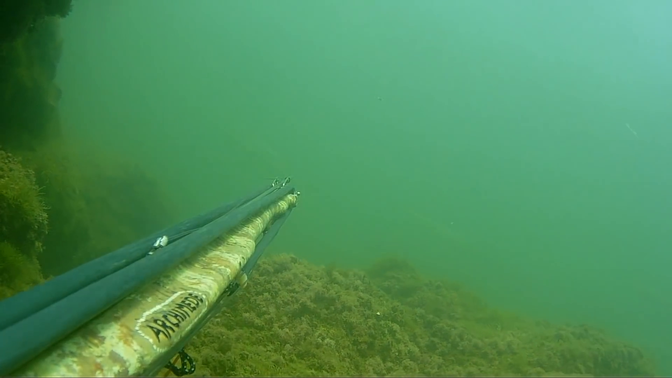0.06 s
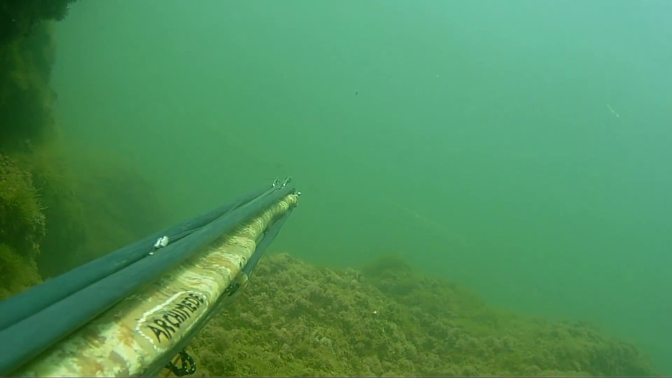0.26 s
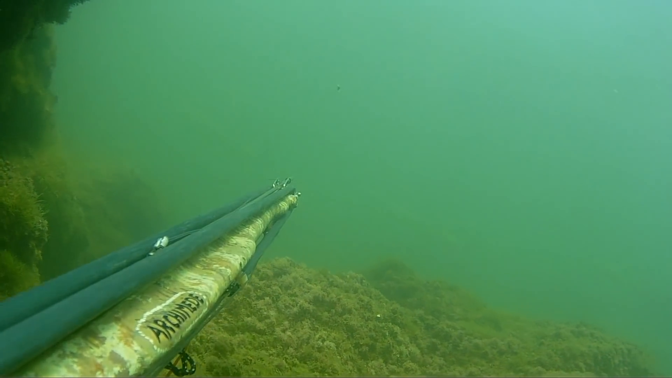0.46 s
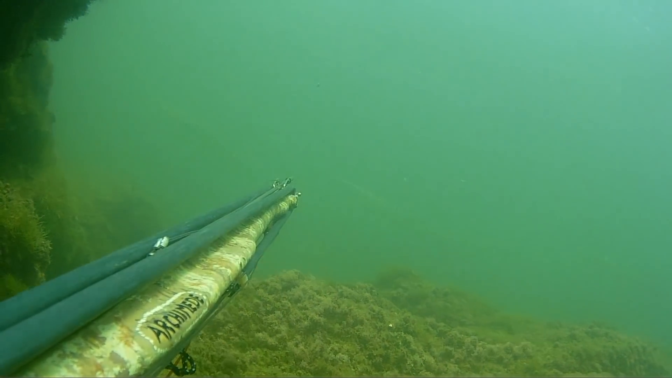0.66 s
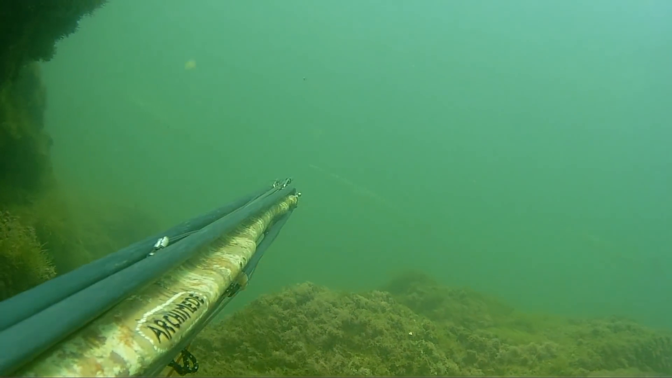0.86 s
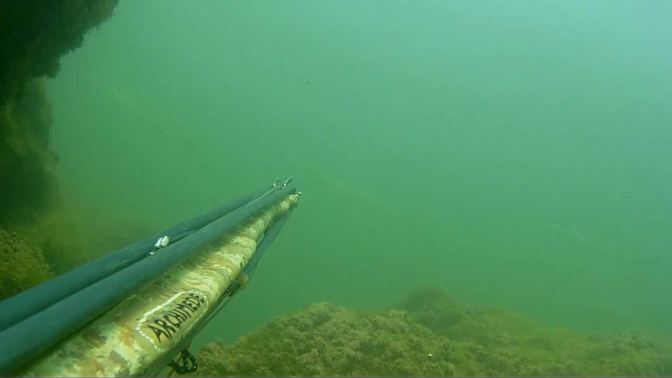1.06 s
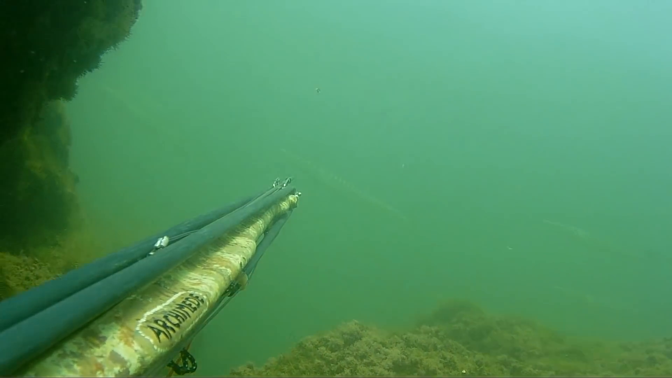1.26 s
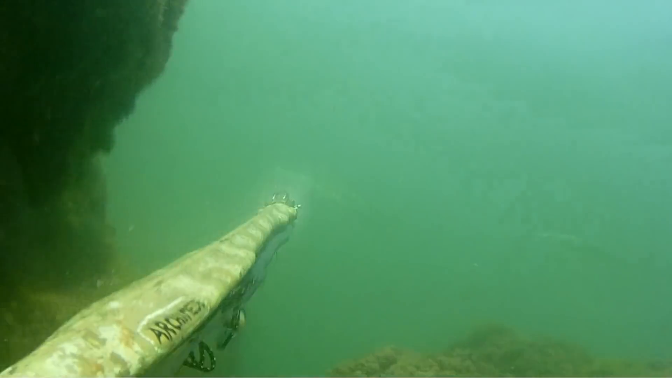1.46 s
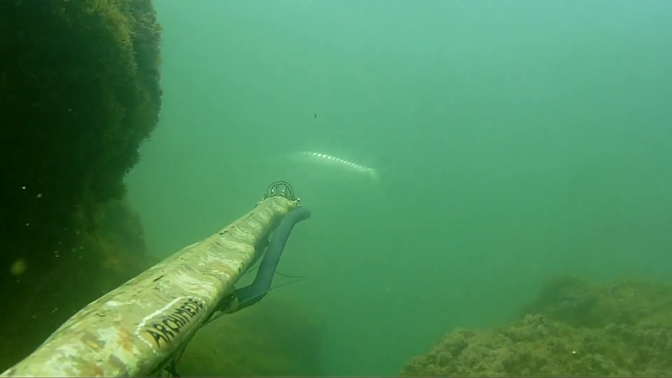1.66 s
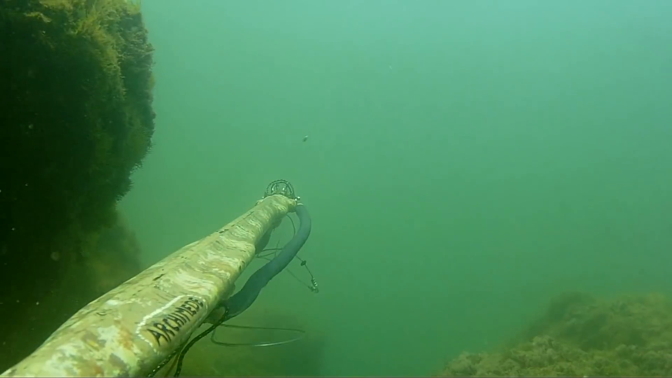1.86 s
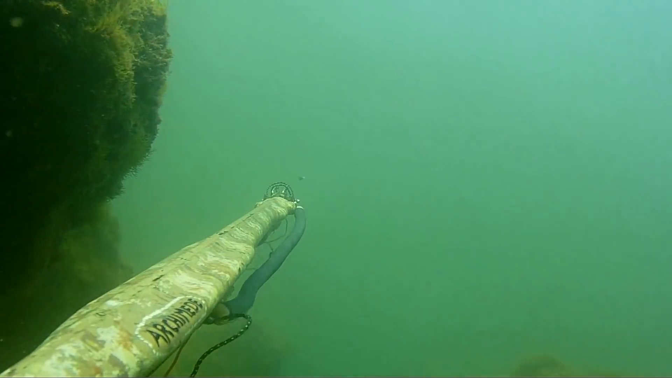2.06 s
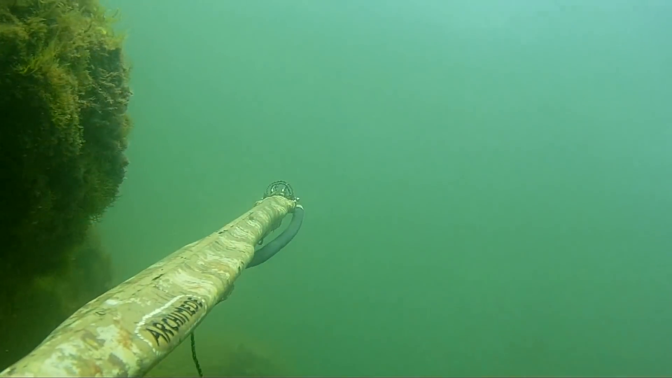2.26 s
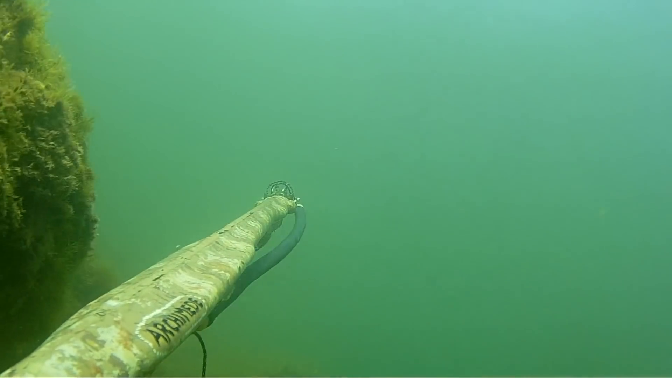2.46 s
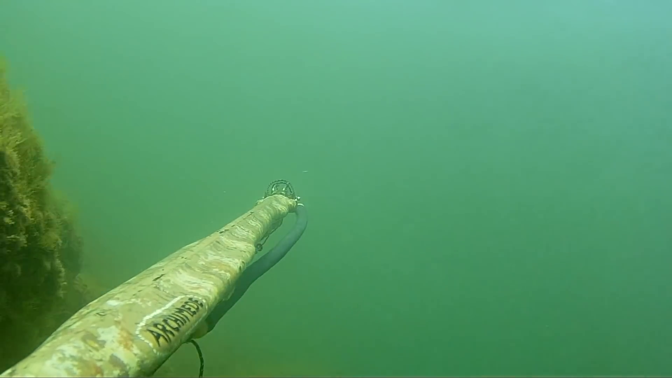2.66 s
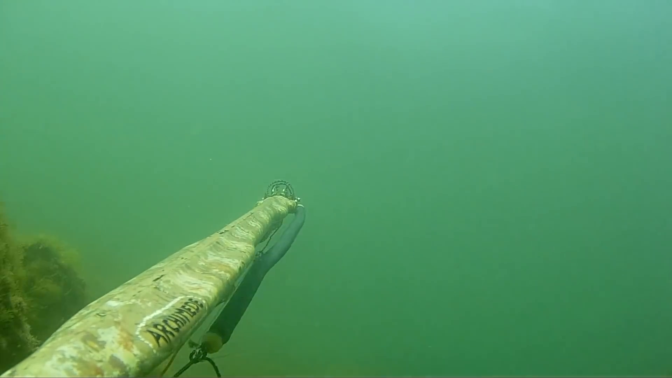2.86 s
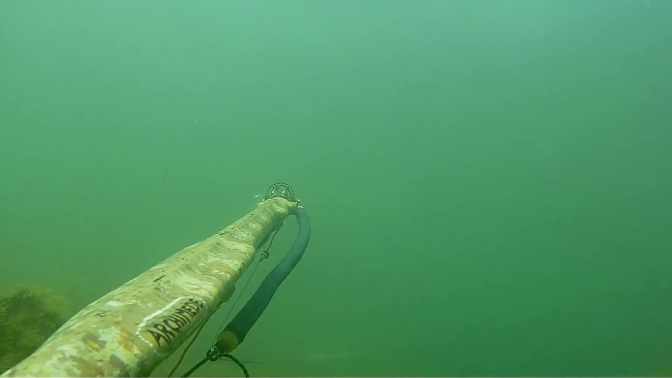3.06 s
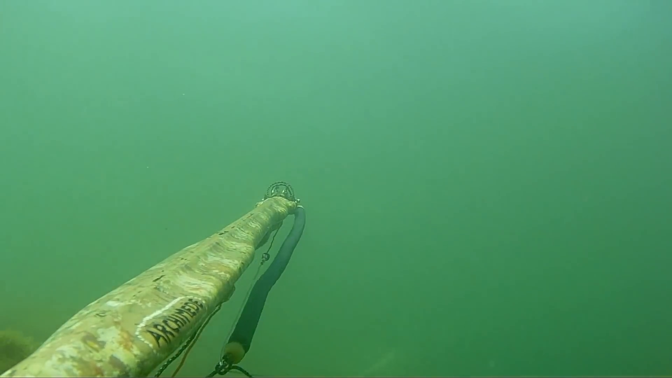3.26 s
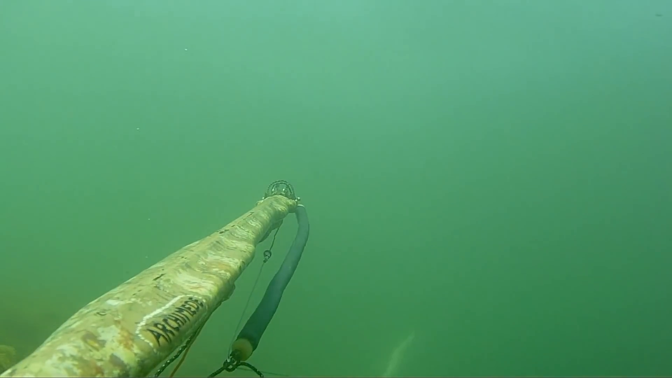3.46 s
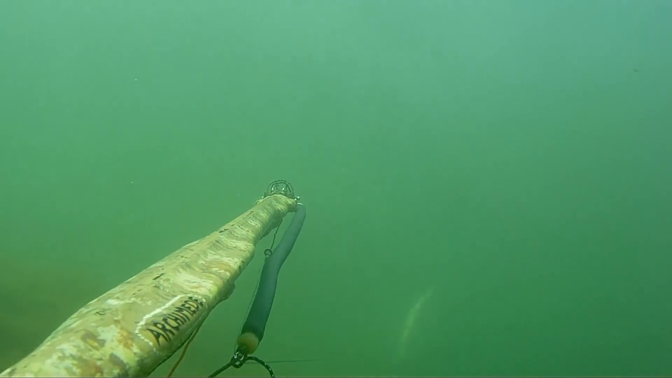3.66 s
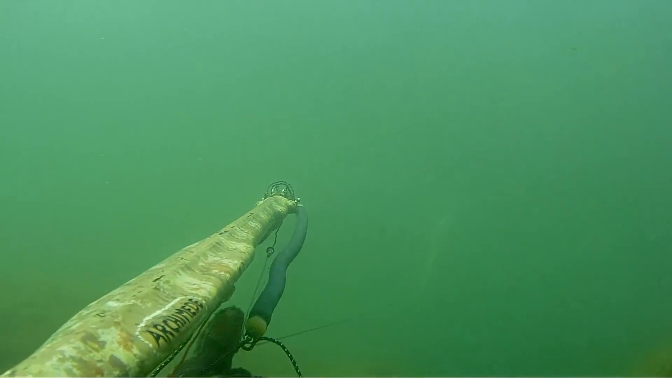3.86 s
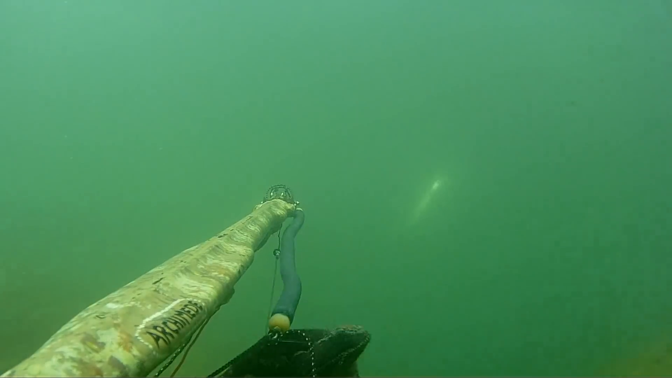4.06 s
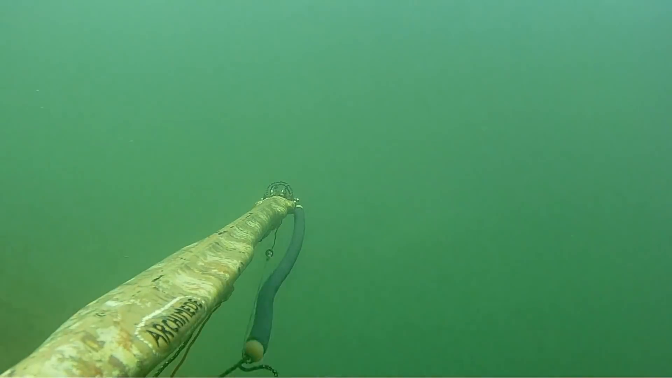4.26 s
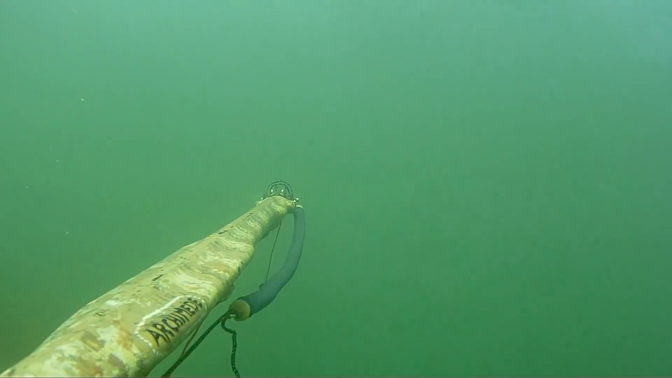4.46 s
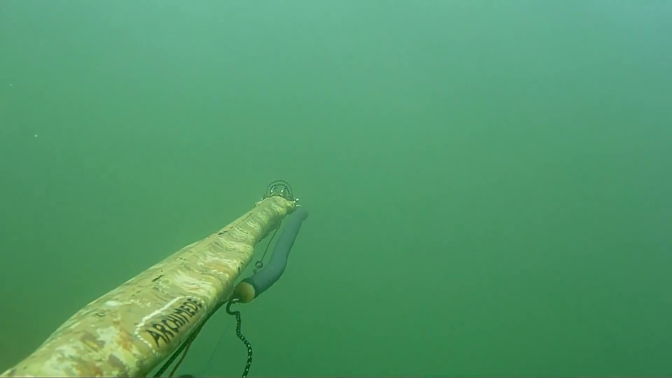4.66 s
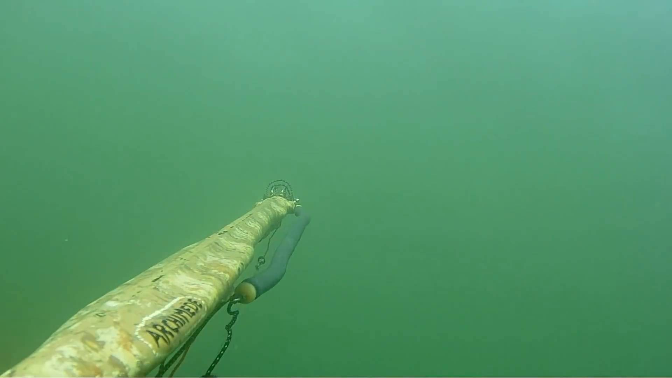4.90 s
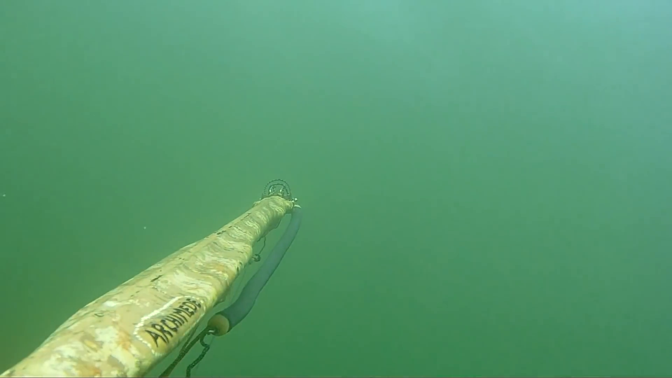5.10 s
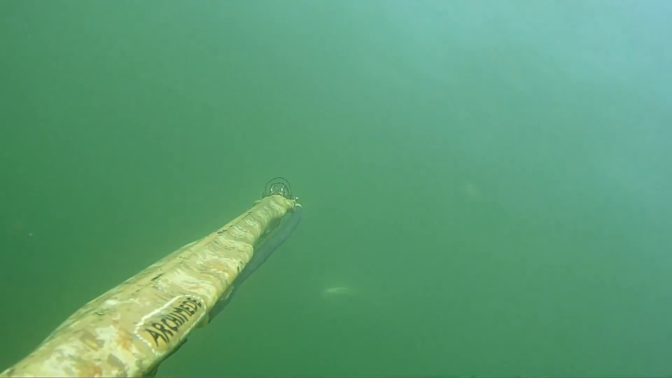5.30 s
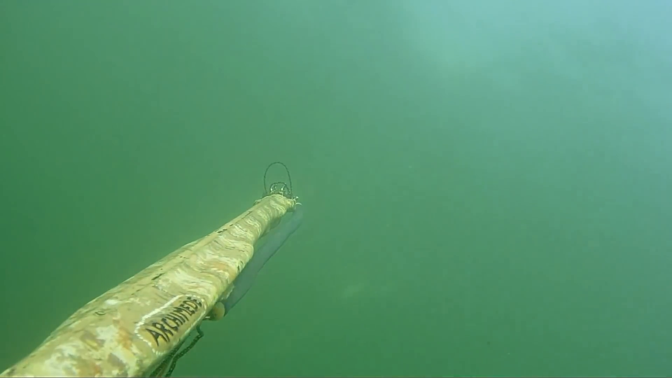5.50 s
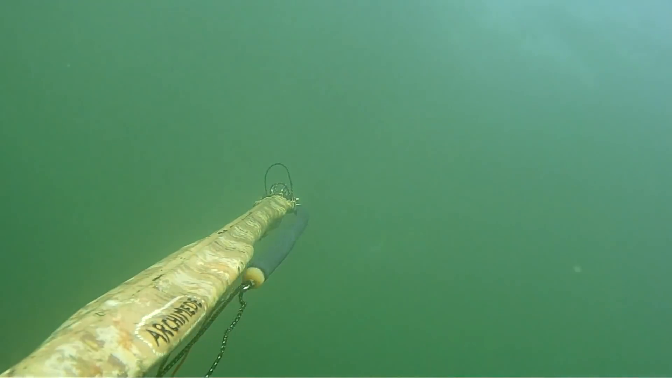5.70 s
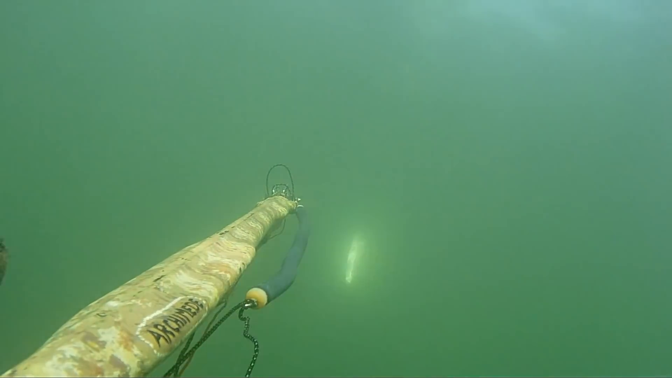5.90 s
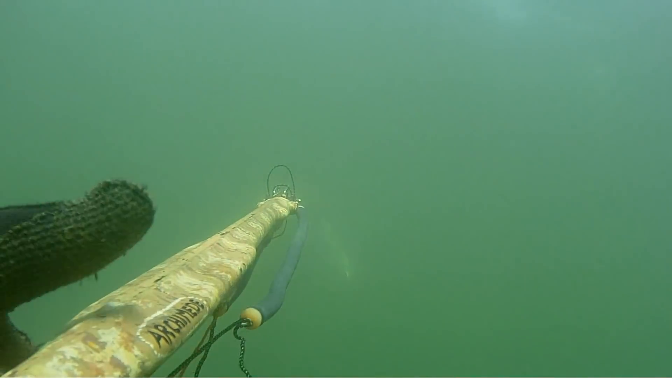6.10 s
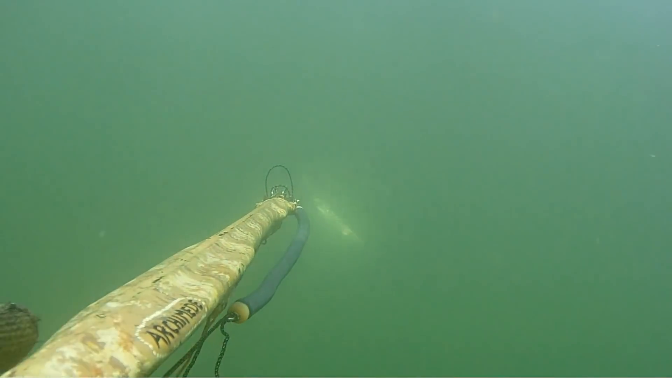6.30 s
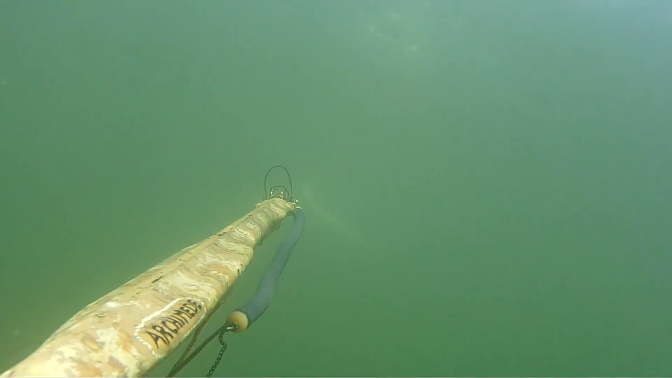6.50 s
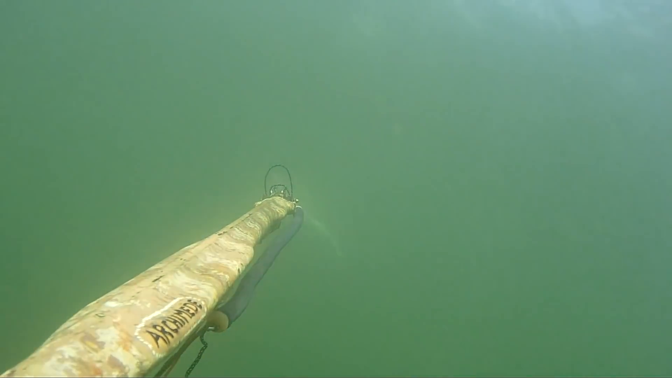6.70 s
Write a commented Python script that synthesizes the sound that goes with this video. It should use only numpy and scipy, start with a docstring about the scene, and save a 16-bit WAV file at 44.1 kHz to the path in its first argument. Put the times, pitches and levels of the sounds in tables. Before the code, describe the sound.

Under water, heard through a sealed camera housing fixed close to a speargun. From 0 to 1.4 s there is only a faint, dull steady hiss, slight rubbing and a deep soft sway that grows a little. A tiny click at about 1.4 s leads straight into the shot: a sharp crack and a dense run of rough blows lasting some 0.15 s, flat and distorted by overload, with heavy low surges. Until about 2.2 s metal clinks, dull knocks and the hissing, ticking line die away. From 2.2 to 4.3 s come sparse muffled taps, glove rubbing and low rumbling sway, with a barely audible fizz near 2.6 s. Firmer knocks cluster at 4.35 and 4.77 s. Wet rubber creaks around 5.2 to 5.4 s, chirps and scrapes until 6 s, then rattling creaks from 6.3 s and a bright squeak at 6.6 s.

```python
"""Under water, at a band-powered speargun, with the microphone of a camera in a sealed housing.
Over a steady hiss the gun sways, a rumble; the trigger cracks and the bands sling the shaft away,
rough noise bursts on slow surges that overload the microphone. Shaft, line and fittings click and knock,
struck modes, amid rubbing and a faint fizz. Late on wet rubber chirps, gliding resonances,
and creaks and squeaks as it sticks and slips."""
import sys
import numpy as np
from scipy import signal
from scipy.fft import rfft, irfft, next_fast_len
from scipy.io import wavfile
from scipy.ndimage import uniform_filter1d

SR = 44100
rng = np.random.default_rng(int(sys.argv[2]) if len(sys.argv) > 2 else 0)


def bounce(signal):
    """Save signal as a 16-bit WAV file at the path given by the first command-line argument."""
    frames = np.transpose(np.atleast_2d(signal))
    limited = np.clip(frames, -1, 1)
    pcm = np.round(limited * 32767).astype(np.int16)
    wavfile.write(sys.argv[1], SR, pcm)


N = 297393
TIME = np.arange(N) / SR
TRIGGER_S, RELEASE_S = 1.4084, 1.506   # the trigger cracks; the shaft leaves the barrel


def from_db(db):
    """Decibels to gain."""
    return 10 ** (np.asarray(db) / 20)


def rms_one(x):
    """Scale to rms 1."""
    return x / np.sqrt(np.mean(x ** 2) + 1e-20)


def in_time(rows):
    """The columns of a curve, read between its rows at every sample."""
    s, *columns = np.transpose(rows)
    return [np.interp(TIME, s, column) for column in columns]


def add(out, s, sound):
    """Mix a sound in at time s."""
    at = round(s * SR)
    out[at:at + len(sound)] += sound[:max(N - at, 0)]


def cut(x, hz, kind="low", order=2):
    """Low- or high-pass."""
    return signal.sosfilt(signal.butter(order, hz, kind, fs=SR, output="sos"), x)


def noise(colour):
    """Noise of a given spectrum, rms 1, rolled off beyond both ends of its table."""
    hz, db = np.transpose(colour)
    size = next_fast_len(N)
    bins = np.maximum(np.arange(size // 2 + 1) * SR / size, 1)
    gain = from_db(np.interp(np.log(bins), np.log(hz), db))
    gain = gain / (1 + (bins / (2 * hz[-1])) ** 4) * (bins > hz[0] / 2)
    return rms_one(irfft(rfft(rng.standard_normal(size)) * gain, size)[:N])


def drift(rate_hz, size=N):
    """Smooth chance with a spread of 1, slower than rate_hz."""
    settle = SR // 10
    return rms_one(cut(rng.standard_normal(size + settle), rate_hz)[settle:])


def ring(force, modes):
    """A force sets the modes of a body ringing, each a damped resonator, with alternating signs."""
    out = 0
    for k, (hz, width_hz, db) in enumerate(modes):
        r, w = np.exp(-np.pi * width_hz / SR), 2 * np.pi * hz / SR
        feed, feedback = [0, 2 * (1 - r) * np.sin(w)], [1, -2 * r * np.cos(w), r * r]
        out = out + (-1) ** k * from_db(db) * signal.lfilter(feed, feedback, force + 1e-18)
    return out


def strikes(rows, modes, chatter_share, low_hz, damping, vary_db=2, detune=0.015):
    """A contact and its dying chatter of tiny rebounds; hard ones ring upper modes, soft ones lower."""
    out, t = np.zeros(N), TIME[:SR // 8]
    for s, db, bright_hz, chatter_s in rows:
        rebounds = rng.standard_normal(len(t)) ** 3   # a few stand out
        force = chatter_share * rms_one(rebounds) * np.exp(-t / chatter_s)
        force[0] += 1
        force = cut(cut(force, bright_hz * 1.46), low_hz + bright_hz * 0.48, "high")
        # no two contacts ring alike
        struck = [(hz * (1 + detune * rng.standard_normal()), width_hz * damping,
                   level_db + vary_db * rng.standard_normal()) for hz, width_hz, level_db in modes]
        sound = ring(force, struck)
        loudest = np.sqrt(uniform_filter1d(sound ** 2, size=SR // 200).max())   # rms over 5 ms
        add(out, s, from_db(db) * sound / loudest)
    return out


def evened(x, length_s):
    """Hold a sound at rms 1 for its length, then let it die freely."""
    power = uniform_filter1d(x ** 2, size=SR // 50)
    held = np.minimum(np.arange(len(x)), int(length_s * SR))
    return x / np.sqrt(np.abs(power[held]) + 1e-20)


def after_shot(db, db_per_s):
    """A gain that holds from the trigger until the shaft has left, then dies away."""
    return (TIME > TRIGGER_S) * from_db(db - db_per_s * np.maximum(TIME - RELEASE_S, 0))


# The steady hiss at the microphone. Each row: frequency in Hz, relative level in dB.
HISS_SPECTRUM = [(30, 3.5), (200, 9.5), (600, 4), (1500, -6.5), (3000, -10), (5000, -15.5), (8000, -20.5),
                 (13000, -23)]


def hiss(level_db=-59):
    """Steady broadband noise, strongest in the lows."""
    return from_db(level_db) * noise(HISS_SPECTRUM)


# Sway of the gun in the water, first while aiming, then after the shot. Each row: time in seconds, level in dB.
AIMING_SWAY = [(0.0, -57), (0.602, -55.5), (0.676, -56.5), (1.24, -52), (1.38, -47.5)]
LATER_SWAY = [(1.8, -41), (2.01, -51), (2.05, -40.5), (2.31, -37.5), (2.38, -49.5), (3.02, -37),
              (3.33, -48), (3.37, -35.5), (3.779, -42.5), (4.11, -32.5), (4.28, -52), (4.41, -30),
              (4.54, -49), (4.99, -52), (5.05, -60), (5.32, -41), (5.73, -52.5), (6.74, -42)]
# Spectrum of the sway's rumble. Each row: frequency in Hz, relative level in dB.
SWAY_SPECTRUM = [(15, -11.5), (27, 1.5), (36, 4.5), (50, -15), (78, -10.5), (110, -31), (200, -30),
                 (400, -39.5)]


def rocking(recoil_db=-19.5, recoil_db_per_s=74):
    """The gun rocks in the water with the arm's sway and with the recoil: an evened-out low rumble."""
    sway_db, = in_time(AIMING_SWAY + LATER_SWAY)
    rumble = noise(SWAY_SPECTRUM)
    rumble = rumble / np.sqrt(uniform_filter1d(rumble ** 2, size=SR // 12))
    return np.hypot(from_db(sway_db), after_shot(recoil_db, recoil_db_per_s)) * rumble


# Glove and slack line rubbing on the stock, close by.
# Each row: time in seconds, glove level in dB, line level in dB, both before a trim.
RUBBING = [(2.25, -53, -66.5), (2.43, -62, -68), (2.92, -56.5, -68), (3.3, -63, -65.5), (3.64, -53.5, -67),
           (3.99, -51, -66), (4.11, -59, -65.5), (4.81, -63.5, -71.5), (5.01, -56, -63), (5.25, -62, -59.5),
           (5.38, -47.5, -63), (5.56, -54.5, -62), (5.91, -51.5, -55), (6.05, -56.5, -63),
           (6.28, -61.5, -57.5)]
# Spectrum of the line's hiss. Each row: frequency in Hz, relative level in dB.
LINE_SPECTRUM = [(600, -18.5), (1000, 2.5), (1350, 1), (1700, 1), (2100, -8), (2600, -15.5), (4000, -33.5),
                 (8000, -59.5)]
# Modes of the camera housing, also rung by the knocks.
# Each row: frequency in Hz, width in Hz, level in dB; a strike scales the width and varies the rest.
HOUSING_MODES = [(178, 56, -0.5), (277, 80, 0.5), (382, 55, 3.5), (489.3, 47, 6.5), (659.6, 40.4, 7.5),
                 (768, 59, -1.5), (863, 73, -2), (1070, 250, -16), (1260, 170, -7.5), (1620, 37, -5.5),
                 (1830, 53, -9.5), (2940, 180, -30.5), (3450, 300, -43), (4500, 510, -34)]
# Modes of the steel parts, damped by water, also rung by the clinks. Columns as for the housing.
STEEL_MODES = [(825, 170, 2.5), (1302, 120, 5), (1640, 170, 8), (1893, 190, 3), (2200, 320, -11),
               (2876, 170, -9), (3430, 260, -13.5), (4630, 250, -19), (5520, 220, -23.5),
               (6520, 250, -25.5), (7900, 2100, -37.5)]


def running_line(db=-61, db_per_s=5, run_s=0.756, stop_s=0.03):
    """Level of the line that runs out behind the shaft, slows and stops."""
    stopping = np.exp(-np.maximum(TIME - RELEASE_S - run_s, 0) / stop_s)
    return after_shot(db, db_per_s) * stopping


def handling(grip_db=-63.5, grip_hiss_db=-73.5, glove_trim_db=-.5, slack_trim_db=-3,
             lump_db=3, grain_db=4, taps_per_s=28, tap_db=4, ticks_per_s=90):
    """Glove, line and the shaft's wash rub and tap on the gun in small uneven grains."""
    fired = TIME > TRIGGER_S
    glove_db, line_db = in_time(RUBBING)
    lumpy_glove_db = glove_db + glove_trim_db + lump_db * drift(11)
    rub = from_db(np.where(fired, lumpy_glove_db, grip_db))
    slack = from_db(np.where(fired, line_db + slack_trim_db, grip_hiss_db))
    wash, running = after_shot(-32, 115), running_line()
    grain = from_db(grain_db * drift(54))
    taps = (rng.random(N) < taps_per_s / SR) * rng.uniform(-1.2, 1, N)
    # taps join the grains only from the trigger on
    force = grain * rng.standard_normal(N) + from_db(tap_db) * rms_one(taps) * fired
    # the running line shakes the housing 6.5 dB above its own hiss
    body = np.hypot(rub, wash + from_db(6.5) * running)
    rubbing = body * rms_one(cut(ring(force, HOUSING_MODES), 730, order=1))
    # the wash hisses 10.5 dB below its dull part
    hissing = np.hypot(slack, from_db(-10.5) * wash + running) * grain * noise(LINE_SPECTRUM)
    # the running line ticks against the steel of the muzzle, 3 dB above its hiss
    ticks = (rng.random(N) < ticks_per_s / SR) * rng.standard_normal(N)
    ticking = from_db(3) * running * rms_one(cut(ring(ticks, STEEL_MODES), 2390))
    return rubbing + hissing + ticking


# Metal clinks of shaft, wishbone and clip.
# Each row: start in seconds, level in dB, brightness in Hz (filters sit in proportion), chatter in seconds.
METAL_CLINKS = [(1.384, -50, 2000, 0.0034), (1.3935, -36.5, 2180, 0.0024), (1.5555, -24, 5960, 0.00048),
                (1.576, -33, 4200, 0.0066), (1.598, -37.5, 2600, 0.013), (1.6235, -36, 1900, 0.0025),
                (1.632, -30, 4170, 0.002), (1.685, -37.5, 1340, 0.0043), (1.742, -39, 1830, 0.0063),
                (1.7485, -32.5, 1390, 0.0035), (1.785, -46, 3230, 0.0056), (1.866, -41.5, 1690, 0.023),
                (1.895, -41, 1600, 0.0067), (1.940, -51, 1700, 0.0052), (1.9125, -27, 2650, 0.0023),
                (1.980, -42, 1700, 0.0067), (1.994, -41.5, 1730, 0.0092), (2.061, -60, 1700, 0.0027),
                (2.125, -42.5, 1300, 0.0049), (2.159, -48.5, 1420, 0.0088), (2.792, -52.5, 1500, 0.0058),
                (3.016, -58, 1600, .005), (3.914, -55, 2230, 0.006), (4.019, -53, 1500, 0.0022),
                (4.124, -58.5, 1400, 0.0053), (3.4765, -44, 1400, 0.00071), (3.494, -42.5, 5000, 0.0012),
                (4.2265, -41, 1690, 0.0012), (4.357, -45.5, 3250, 0.0013), (4.372, -55, 2400, .0015),
                (4.461, -47.5, 1896, 0.0026), (4.773, -52, 1400, .002), (4.993, -52, 1500, 0.0055),
                (5.134, -53.5, 1396, 0.0043), (5.381, -51.5, 1200, 0.0017), (5.463, -54, 1400, .005),
                (5.535, -47.5, 1710, .004), (5.696, -53.5, 1800, 0.019), (6.038, -53, 2040, 0.0053)]


def clinks():
    """Steel touches steel: hard contacts with much chatter ring the water-damped steel modes."""
    return strikes(METAL_CLINKS, STEEL_MODES, chatter_share=0.68, low_hz=300, damping=.85)


# Blows of the shot. Each row: start in seconds, level in dB before overload, hold in seconds,
# decay in seconds, brightness in Hz (filters sit in proportion).
BLOWS = [(1.4084, 1, 0.0011, 0.0013, 1703), (1.4108, 3.5, 0.00079, .001, 1708),
         (1.4132, 7.5, 0.0021, 0.0016, 2387), (1.4185, 9, 0.0035, 0.00088, 3186),
         (1.430, -34, 0.0079, 0.0029, 902), (1.4397, -12.5, 0.0021, 0.0066, 1700),
         (1.4472, 0.5, 0.0095, 0.006, 1800), (1.460, 1, 0.0018, 0.0043, 2185),
         (1.4685, 2, 0.0043, .001, 2000), (1.4745, 2, 0.0005, 0.00032, 2000),
         (1.4778, 4.5, 0.0016, 0.0023, 2430), (1.486, -10, 0.015, 0.0046, 798),
         (1.4998, -8.5, 0.0043, .004, 1008), (1.5065, -3.5, 0.0011, 0.0037, 1490),
         (1.5187, -4.5, 0.0032, 0.0023, 2800), (1.526, -16.5, 0.0026, 0.014, 1406),
         (1.544, -22, 0.01, .0035, 700)]
# Pressure surges of the recoil and of heavy bumps.
# Each row: start in seconds, level in dB before overload, length in seconds, pitch in Hz.
PRESSURE_SURGES = [(1.407, 0, 0.022, 34.2), (1.4412, 1.5, 0.028, 40.8), (1.466, -4, 0.037, 168.6),
                   (1.482, -5.5, .019, 337), (1.49, -5.5, 0.031, 38.7), (1.557, -21, .045, 42.3),
                   (1.592, -30.5, .022, 170), (2.163, -44.5, 0.03, 180), (3.405, -37.5, .05, 78),
                   (4.352, -36.5, 0.024, 171), (4.378, -31, 0.059, 40)]
# Spectrum the blows are cut from. Each row: frequency in Hz, relative level in dB.
BLOW_SPECTRUM = [(30, 3.5), (170, -2), (300, -2), (650, 0.5), (1000, -9.5), (1700, 2.5), (2600, -12),
                 (5000, -14), (13000, -22)]


def shot(rise_s=.0004, rough_db=2.5, rough_hz=452):
    """Trigger, shaft and bands strike in a quick run, riding on the slow surges of the recoil."""
    out, crash = np.zeros(N), noise(BLOW_SPECTRUM)
    t = TIME[:SR // 8]
    for k, (s, db, hold_s, decay_s, bright_hz) in enumerate(BLOWS):
        grain = crash[k * len(t):(k + 1) * len(t)]
        grain = cut(cut(grain, bright_hz * 0.5, order=1), bright_hz * 0.16, "high", order=1)
        # each blow is a cluster of uneven cracks
        grain = grain * from_db(rough_db * drift(rough_hz, size=len(t)))
        envelope = (1 - np.exp(-t / rise_s)) * np.exp(-np.maximum(t - hold_s, 0) / decay_s)
        add(out, s, from_db(db) * rms_one(grain) * envelope)
    for s, db, length_s, hz in PRESSURE_SURGES:
        swell = np.tanh(3 * np.sin(np.pi * np.minimum(t / length_s, 1)))
        add(out, s, -from_db(db) * swell * np.sin(2 * np.pi * hz * t))
    return out


# Dull knocks on the stock, heard through the housing.
# Each row: start in seconds, level in dB, brightness in Hz (filters sit in proportion), chatter in seconds.
STOCK_KNOCKS = [(1.4715, -4, 255, 0.0069), (1.528, -10.5, 766, 0.002), (1.5405, -13.5, 640, .002),
                (1.549, -15.5, 660, 0.0031), (1.577, -27, 750, 0.012), (1.597, -31.5, 455, 0.015),
                (1.6225, -29, 1000, 0.0023), (1.610, -34, 800, 0.0045), (1.652, -39.5, 700, .006),
                (1.684, -34.5, 805, 0.014), (1.750, -37.5, 800, 0.0016), (1.816, -40, 800, 0.0013),
                (1.9125, -38, 1000, 0.0017), (2.088, -52, 700, 0.003), (2.163, -29.5, 380, 0.0026),
                (2.186, -45, 450, 0.0034), (2.218, -48, 700, 0.005), (2.432, -48.5, 600, 0.0027),
                (2.791, -42.5, 900, 0.0072), (2.803, -44, 644, 0.0051), (2.858, -48.5, 750, 0.0023),
                (2.917, -49.5, 815, .008), (2.995, -48.5, 750, 0.0023), (3.177, -47, 698, 0.0048),
                (3.324, -40.5, 804, 0.005), (3.416, -44, 900, 0.0027), (3.441, -51, 600, .002),
                (3.4765, -47, 900, 0.0012), (3.555, -50, 500, .005), (3.590, -51, 500, .005),
                (3.640, -47.5, 604, 0.0045), (3.662, -41, 500, 0.0082), (3.688, -44, 480, 0.0039),
                (3.760, -56, 550, .005), (3.807, -46.5, 600, 0.003), (3.853, -45, 439, 0.0081),
                (3.945, -43.5, 630, 0.0069), (3.963, -44.5, 805, .002), (4.019, -38.5, 950, 0.0033),
                (4.100, -43.5, 800, 0.001), (4.227, -42, 950, 0.0017), (4.3505, -27, 815, 0.005),
                (4.3525, -32, 327, 0.005), (4.3575, -30.5, 844, 0.0034), (4.3635, -35, 680, 0.0032),
                (4.396, -54, 800, .002), (4.4205, -40, 820, 0.0008), (4.448, -54, 846, 0.0022),
                (4.625, -48.5, 1095, 0.012), (4.7655, -45, 650, .001), (4.7715, -33, 950, 0.0046),
                (4.7855, -33, 650, 0.0009), (4.7935, -32.5, 750, .001), (4.944, -57, 700, .005)]


def knocks():
    """Soft contacts with little chatter ring the low modes of the housing."""
    return strikes(STOCK_KNOCKS, HOUSING_MODES, chatter_share=0.079, low_hz=60, damping=1.25)


# The shaft's tail and the wishbone slap the muzzle.
# Each row: start in seconds, level in dB, brightness in Hz (filters sit in proportion), chatter in seconds.
MUZZLE_SLAPS = [(1.5195, -10.5, 895, 0.0042), (1.5475, -29, 2600, .002), (1.5540, -17, 4450, 0.0016)]
# Modes of the muzzle. Each row: frequency in Hz, width in Hz, level in dB; a slap scales and varies them.
MUZZLE_MODES = [(1498, 36, 10), (2140, 230, 3.5), (2860, 80, -6), (3210, 120, -7)]


def slaps():
    """Sharp contacts with little chatter ring the muzzle."""
    return strikes(MUZZLE_SLAPS, MUZZLE_MODES, chatter_share=0.1, low_hz=300, damping=1.1)


def fizz(start_s=2.54, length_s=0.21, level_db=-72, pops_per_s=2000, low_hz=4000, patchy_db=2):
    """Fine bubbles come in puffs: a brief, faint, high rustle that swells and fades."""
    size = int(length_s * SR)
    pops = (rng.random(size) < pops_per_s / SR) * rng.uniform(.3, 1, size)
    swell = np.sqrt(np.sin(np.linspace(0, np.pi, size)).clip(0))
    swell = swell * from_db(patchy_db * drift(30, size=size))
    puffs = swell * cut(pops, 60, order=1) * rng.standard_normal(size)
    out = np.zeros(N)
    add(out, start_s, from_db(level_db) * rms_one(cut(cut(puffs, low_hz, "high"), 9900)))
    return out


# Chirps, pings and scrapes of wet rubber and line, each one a gliding resonance; the narrow row at 4.795 s # is
# instead the lingering ring of a knock on the stock. # Each row: start in seconds, length in seconds, level in
# dB (3 dB above its rms), start pitch in Hz, # end pitch in Hz, width in Hz.
RUBBER_CHIRPS = [(4.282, 0.11, -54, 1400, 1573, 700), (4.795, 0.024, -40.5, 627, 635, 60),
                 (4.975, 0.029, -59, 3060, 2700, 304), (5.024, 0.01, -64, 4650, 4700, 150),
                 (5.019, 0.012, -51.5, 1390, 1440, 180), (5.373, 0.032, -44.5, 870, 805, 150),
                 (5.376, 0.015, -51, 1460, 1390, 149), (5.46, 0.01, -55, 3220, 3000, 251),
                 (5.531, 0.016, -41, 1390, 1380, 238), (5.582, 0.019, -49.5, 840, 930, 201),
                 (5.611, 0.0286, -49.5, 1385, 1590, 320), (5.748, 0.072, -43.5, 1133, 1254, 260),
                 (5.773, 0.044, -38.5, 1033, 1104, 205), (5.795, 0.022, -50.5, 1370, 1640, 350),
                 (5.763, 0.051, -45, 546, 590, 154), (5.886, 0.076, -47, 482, 635, 160),
                 (5.918, 0.036, -42.5, 1887, 1750, 260), (5.924, 0.05, -42, 1166, 1383, 344),
                 (5.933, 0.047, -41, 1625, 1915, 263), (5.951, 0.05, -56.5, 2220, 2900, 500),
                 (6.224, 0.08, -47.5, 601, 686, 396), (6.538, 0.017, -58, 3520, 3300, 201),
                 (6.697, .016, -48, 1840, 1750, 151)]


def chirps(sing_hz=300):
    """Friction drives a resonance that glides as rubber stretches; narrow ones sing, wide ones scrape."""
    out = np.zeros(N)
    for s, length_s, db, start_hz, end_hz, width_hz in RUBBER_CHIRPS:
        u = np.linspace(0, 1, int(length_s * SR))
        phase = 2 * np.pi * np.cumsum(start_hz + (end_hz - start_hz) * u) / SR
        steady = (sing_hz / width_hz) ** 2
        grains = (steady + drift(width_hz / 2, size=len(u))) * np.sin(phase)
        grains = grains + drift(width_hz / 2, size=len(u)) * np.cos(phase)
        add(out, s, from_db(db) * rms_one(grains * np.sin(np.pi * u)) / np.sqrt(2))
    return out


# Creaks of wet rubber on the gun. Each row: start in seconds, length in seconds, level in dB,
# fade in dB (negative swells), first and last slips per second before arch and sag,
# unevenness from 0 to 1 (less at fast rates), brightness in Hz (held within limits).
RUBBER_CREAKS = [(5.197, 0.069, -36, 5, 256, 262, 0.04, 1710),
                 (5.265, 0.014, -36.5, 0, 240, 187, .04, 1580),
                 (5.313, 0.015, -33.5, 9, 170, 95, 0.18, 1620), (5.4, .029, -34, 7, 107, 64, 0.13, 1810),
                 (6.297, 0.0096, -28, -4.5, 253, 192, 0.15, 910),
                 (6.3082, 0.047, -23, 4, 174, 81, 0.07, 1110),
                 (6.361, 0.043, -32, 2.5, 54, 187, 0.08, 1150),
                 (6.402, 0.052, -29.5, 1.5, 165, 176, .025, 1400),
                 (6.455, 0.025, -31, 2, 182, 213, 0, 1000), (6.564, 0.01776, -24, -1.5, 345, 455, .05, 960),
                 (6.583, 0.014, -30, 5.5, 417, 395, 0.11, 1500),
                 (6.588, .071, -21, 10.5, 754, 760, 0.04, 1250),
                 (6.657, 0.027, -32, 0.5, 394, 320, 0.14, 1690),
                 (6.694, .016, -32.5, 5, 410, 330, 0.07, 1700)]
# Modes that a creak rings. Each row: frequency in Hz, width in Hz, level in dB.
RUBBER_MODES = [(242, 200, -7.5), (351, 56, 7), (462, 60, 3.5), (515, 116, 2.5), (645, 59, 8),
                (740, 110, 1), (875, 65, 2), (1266, 110, -11.5), (1596, 80, -4), (1870, 132, -9),
                (2940, 200, -20), (4590, 260, -27)]


def creaks(rise_s=0.0031, ring_out_s=0.012, fade_power=3.1, arch=.015, sag_per_db=.005, scuff=.014,
           dull_hz=700, sharp_hz=2600, merge_hz=215, lock_hz=560):
    """Rubber sticks and slips: slow slips rattle, fast ones lock into a clean squeal."""
    out = np.zeros(N)
    for start, length_s, db, fade_db, first_rate, last_rate, uneven, bright_hz in RUBBER_CREAKS:
        t = TIME[:int(length_s * SR) + SR // 20]
        progress = np.minimum(t / length_s, 1)
        # the strain runs out towards the end
        spent_db = fade_db * progress ** fade_power
        period = (1 - progress) / first_rate + progress / last_rate
        # slips quicken in the middle and slow as the creak fades
        rate = (1 + arch * np.sin(np.pi * progress)) * (1 - sag_per_db * spent_db) / period
        uneven = uneven / (1 + (rate / lock_hz) ** 6)
        turns = np.cumsum(rate * np.exp(uneven * drift(260, size=len(t)))) / SR
        # every turn lets go at once: an impulse placed between two samples
        let_go = np.floor(turns) + np.minimum(turns % 1 * SR / rate, 1)
        slips = np.diff(let_go, prepend=0) * np.exp(2 * uneven * drift(400, size=len(t)))
        scuffing = scuff * np.sqrt(uneven * 10) * rng.standard_normal(len(t))
        force = (slips + scuffing) * (t < length_s)
        # gentle slips are rounded, sharp ones keep their edge
        force = cut(force, np.clip(bright_hz, dull_hz, sharp_hz))
        rattle = evened(ring(force, RUBBER_MODES), length_s)
        # quick, regular slips also swing the whole rubber at their own rate
        swing = np.exp(-10 * uneven) / (1 + (merge_hz / rate) ** 4)
        sound = evened(rattle + 2 * swing * np.sin(2 * np.pi * turns), length_s)
        envelope = (1 - np.exp(-t / rise_s)) * np.exp(-np.maximum(t - length_s, 0) / ring_out_s)
        add(out, start, from_db(db - spent_db) * envelope * sound)
    return out


def scene():
    """All sources meet at the one microphone, over a steady hiss."""
    swaying = hiss() + rocking() + handling()
    firing = clinks() + shot() + knocks() + slaps()
    return (swaying + firing + fizz() + chirps() + creaks())[None]


def record(dry, overload_db=-10, leak=0.017, cutoff_hz=13550):
    """The microphone overloads with flat tops, a small share leaks past, and the treble is cut."""
    top = from_db(overload_db)
    flat = dry / (1 + (dry / top) ** 6) ** (1 / 6)
    treble_cut = signal.ellip(10, .1, 80, cutoff_hz, fs=SR, output="sos")
    return signal.sosfilt(treble_cut, flat + leak * (dry - flat))


dry = scene()
out = record(dry)
bounce(out)
```